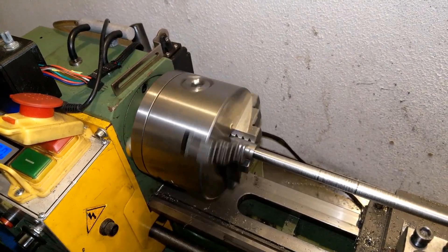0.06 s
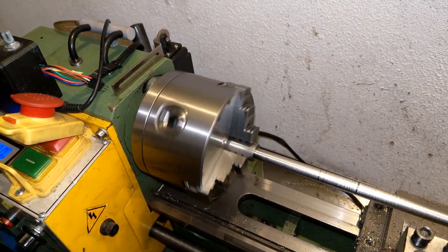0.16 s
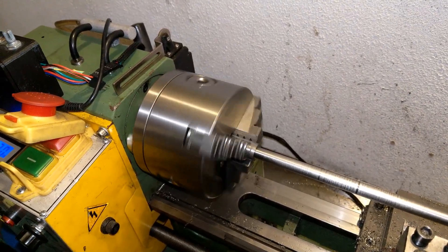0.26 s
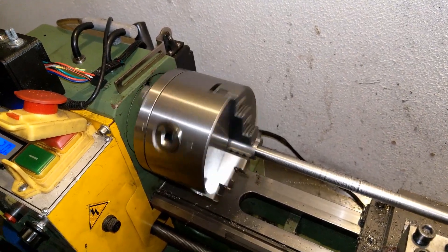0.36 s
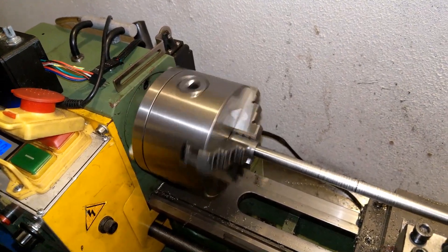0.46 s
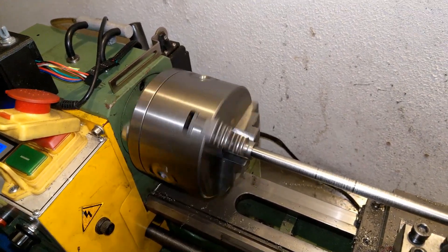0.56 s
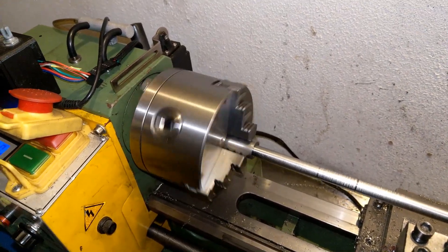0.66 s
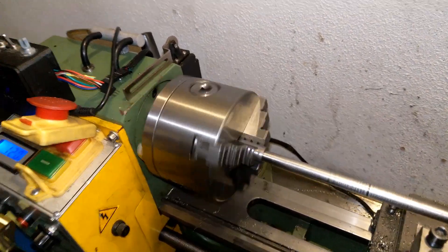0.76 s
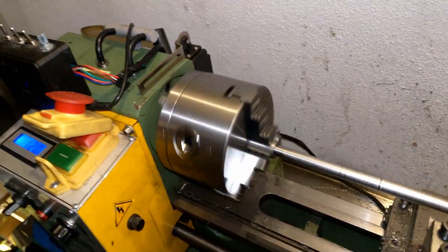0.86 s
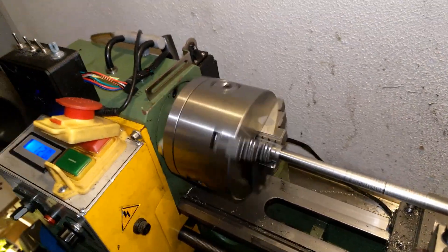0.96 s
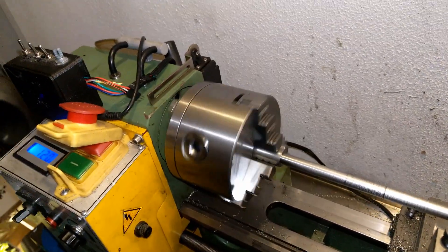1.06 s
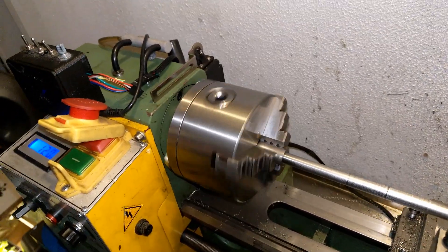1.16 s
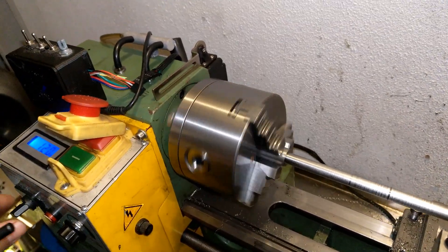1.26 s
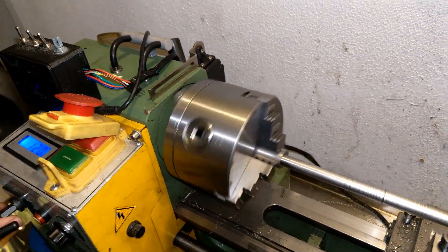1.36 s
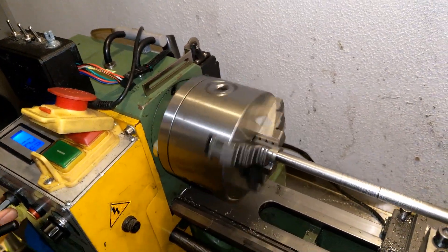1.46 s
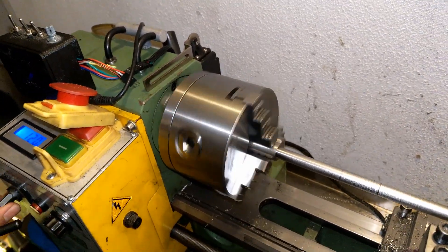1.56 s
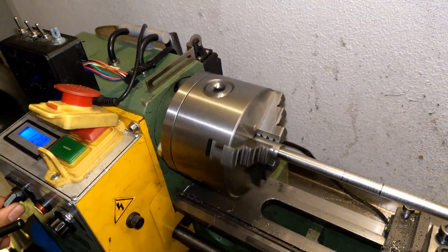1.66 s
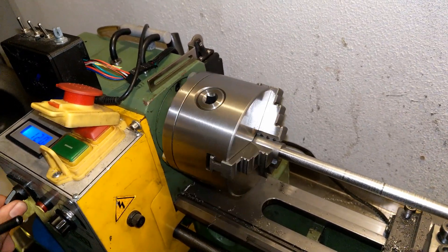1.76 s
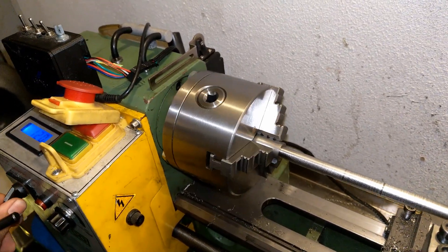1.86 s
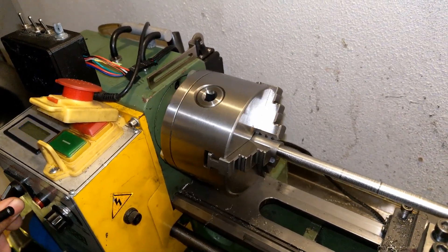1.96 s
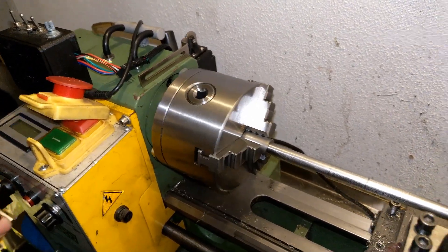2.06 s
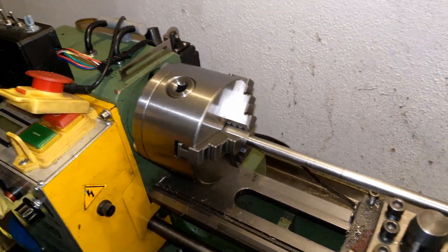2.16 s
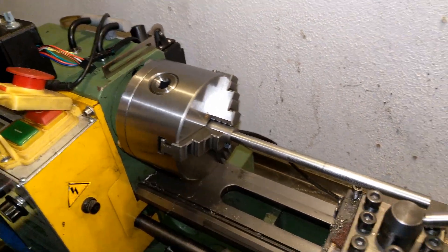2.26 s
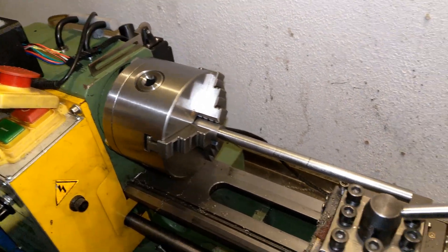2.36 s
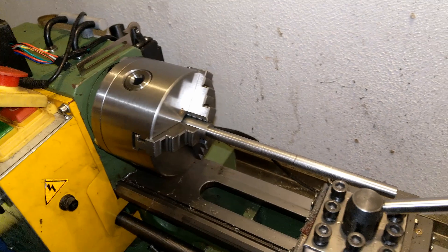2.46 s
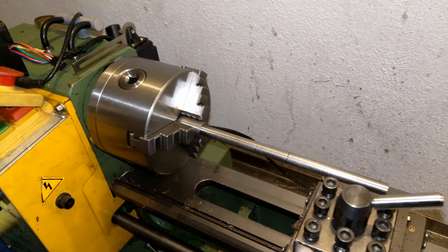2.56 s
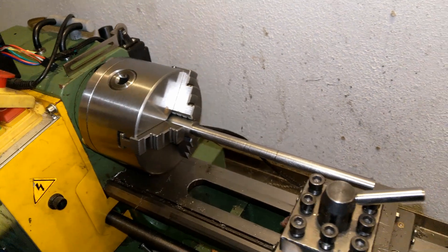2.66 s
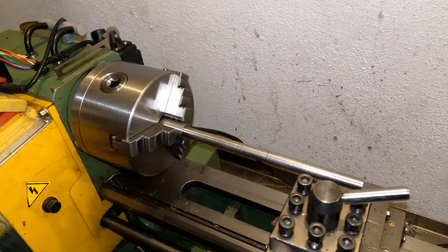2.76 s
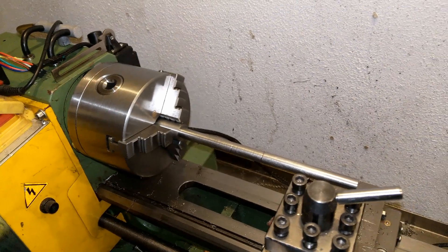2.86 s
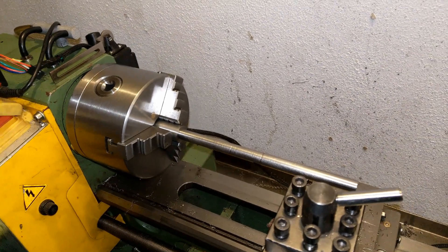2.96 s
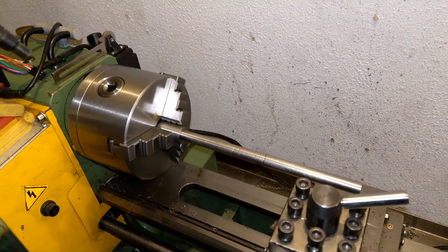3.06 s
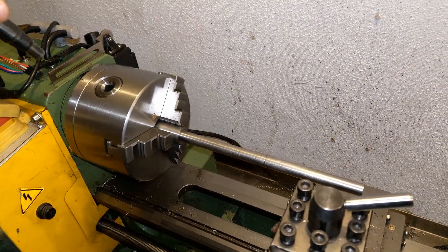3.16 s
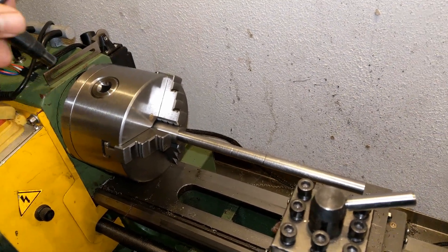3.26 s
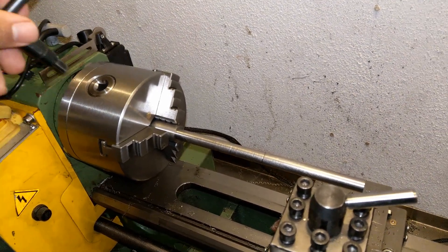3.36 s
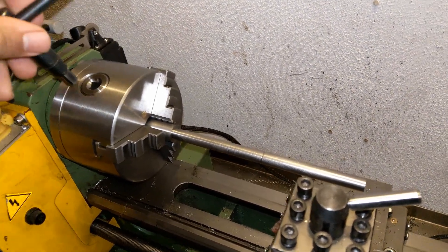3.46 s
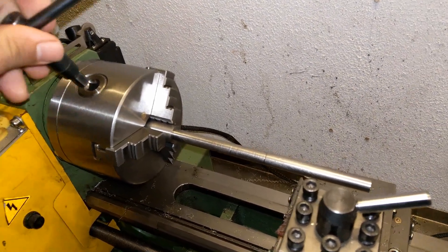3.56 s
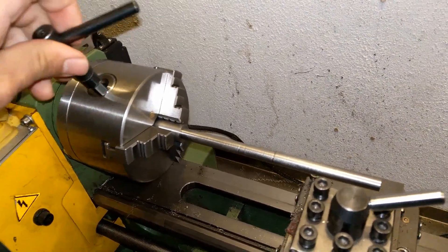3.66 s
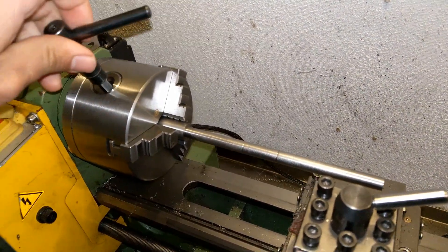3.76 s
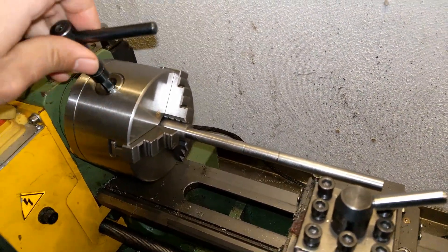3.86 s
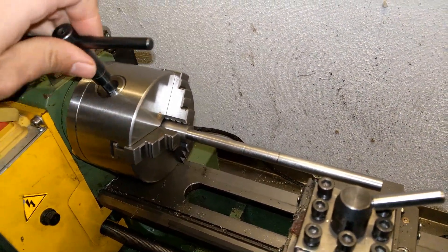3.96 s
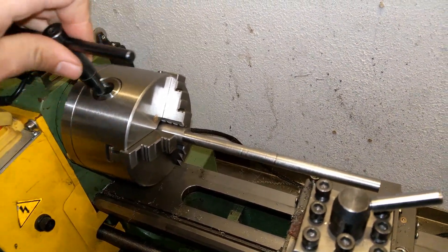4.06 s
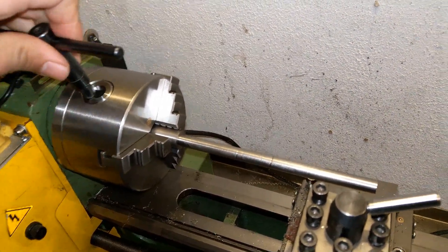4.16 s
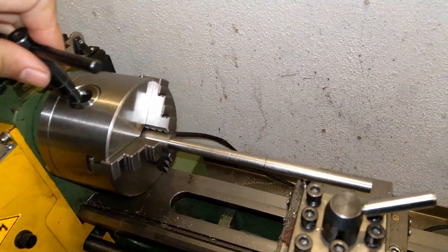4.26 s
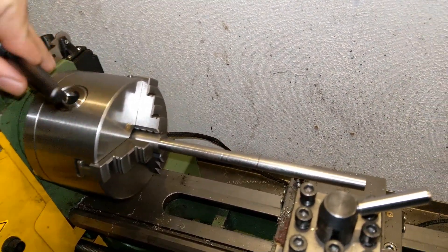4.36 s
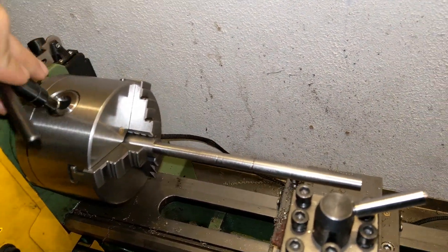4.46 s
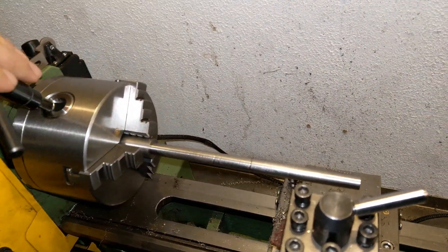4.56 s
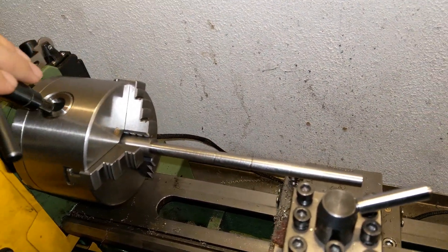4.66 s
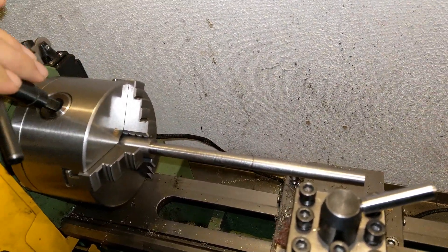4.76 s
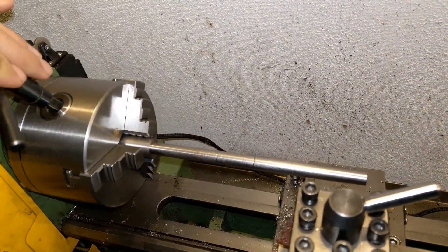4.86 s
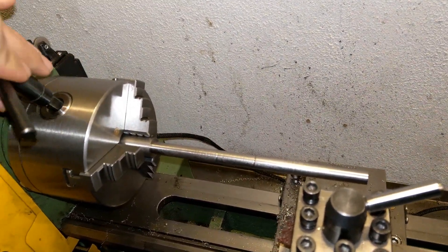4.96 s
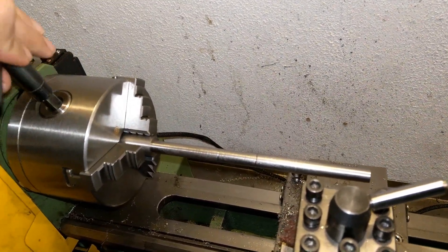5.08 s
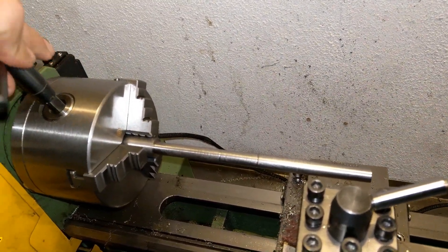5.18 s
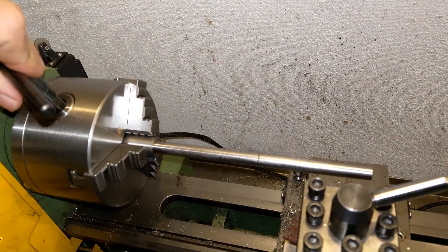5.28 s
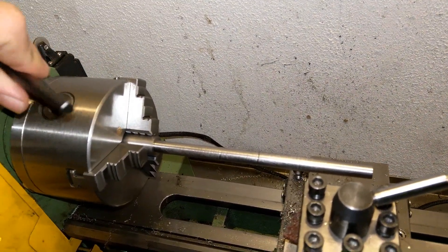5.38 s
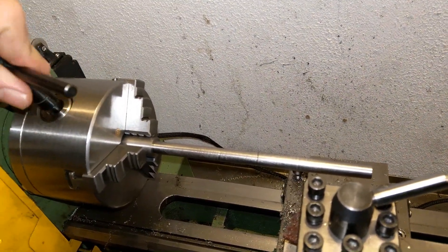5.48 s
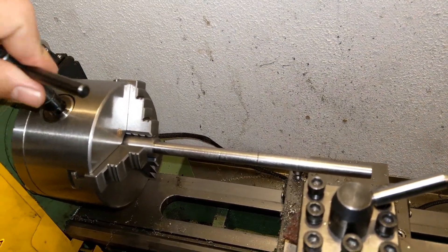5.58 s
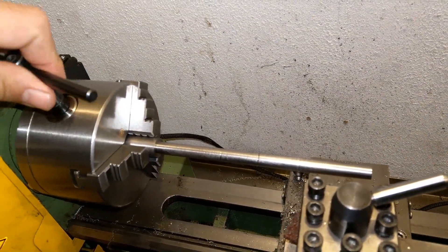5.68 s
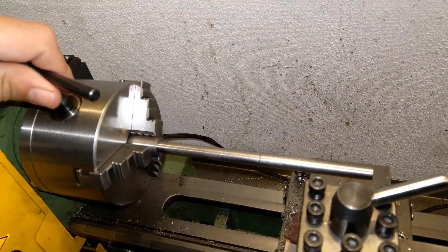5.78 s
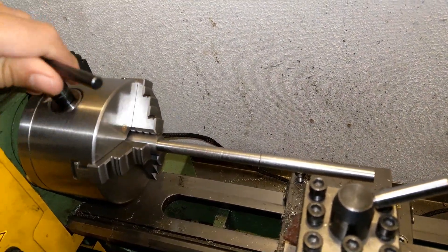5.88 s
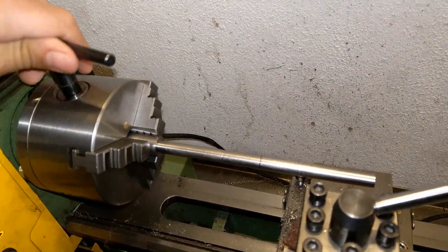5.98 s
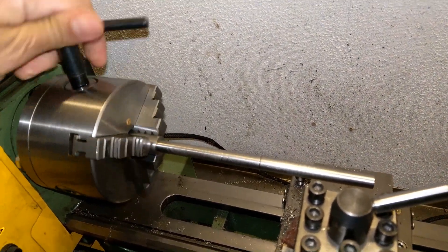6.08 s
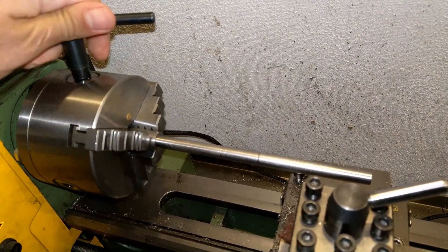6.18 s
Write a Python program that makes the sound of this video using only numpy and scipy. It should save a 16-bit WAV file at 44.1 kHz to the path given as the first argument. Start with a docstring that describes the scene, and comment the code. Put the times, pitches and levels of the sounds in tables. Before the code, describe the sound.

A small metal lathe hums close by, with whirring gears and a high hiss, while a hand bumps and rubs the microphone. Two switches snap and the machine stops with a few thuds. After a quiet pause, a steel key ticks in the chuck and is turned, bringing dull knocks, short rough groans and faint, thin squeals from the creeping motor. The place is a small workshop with hard walls.

```python
"""In a small workshop with hard walls, a metal lathe runs close to a hand-held camera.
Its motor hums and its gears whirr while the hand bumps the camera. Two switches snap and the spindle
(the main shaft) stops. A steel key is set into the chuck (the clamp on the spindle) and turned: it
ticks in its socket, knocks the spindle against its gears and makes the spiral inside the chuck groan.
The creeping motor hisses and squeals thinly."""
import sys
import numpy as np
from scipy import signal
from scipy.fft import rfft, irfft, next_fast_len
from scipy.io import wavfile
from scipy.ndimage import map_coordinates

SR = 44100
rng = np.random.default_rng(int(sys.argv[2]) if len(sys.argv) > 2 else 0)


def transcribe(u):
    """Save the signal u as a 16-bit wav file named by the first command-line argument.

    u: samples, shape (n,) or (channels, n), limited to [-1, 1]; the rate is SR.
    q: integer samples, one column per channel.
    """
    v = np.clip(np.atleast_2d(u).T, -1, 1)
    q = np.round(v * 32767).astype(np.int16)
    wavfile.write(sys.argv[1], SR, q)


N = 274467

# Tone colours of a high hiss and a deep rumble (frequency [Hz], relative level [dB])
HISS_COLOUR = [(7000, -83), (8600, -17), (9300, 1.5), (10500, 6), (12500, -1.5), (14200, -3)]
RUMBLE_COLOUR = [(12, -5), (20, -2), (81, -4.5), (97, -14), (146, -18), (173, -22.5), (200, -24),
                 (260, -30), (440, -120)]


def lathe():
    """The motor hums, its brushes hiss and the gear teeth whirr; loudness follows the speed."""
    # How fast the motor turns (time [s], speed [turns/s])
    motor_speed = [(0, 83.5), (.5, 82.6), (.9, 83.6), (1.79, 84.7), (1.88, 68.5), (2.0, 77), (2.2, 20)]
    # Tones of the hum (multiple of the motor speed, relative level [dB])
    hum_tones = [(1, 4), (2, -14.5), (4, -26.5), (8, -47), (10, -42)]
    # Gear tones at full speed (pitch [Hz], level [dB])
    gear_tones = [(149.6, -57.5), (426, -61.5), (597, -66), (631, -70), (659, -66.5), (705, -65),
                  (826, -67), (860, -63.5), (900, -64.5), (1095, -70.5), (1225, -75), (1715, -69),
                  (1905, -68), (2085, -71.5)]
    # Noise of the gears (frequency [Hz], relative level [dB])
    whirr_colour = [(120, -59), (200, -3.5), (374, -9), (427, -3), (526, -34), (610, -7.5), (774, -5),
                    (885, -5), (1360, -13), (1920, -13.5), (2290, -11), (3430, -17.5), (4680, -11),
                    (5680, -27.5), (7000, -22.5), (9100, -113), (15400, -120)]
    full_speed, tooth_hz, teeth_per_turn = 83.5, 142, 40
    mount_hz, mount_width_hz = 75.4, 6.3
    power_off_s, silent_s = 1.82, 1.93
    t = np.arange(N) / SR
    speed, = curves(motor_speed)
    pace = speed / full_speed
    tooth_angle = phase(tooth_hz * pace)
    spindle_angle = tooth_angle / teeth_per_turn
    waver = 1 + .017 * np.sin(spindle_angle) + .009 * wobble(9)  # a small surge with each turn
    shaft_angle = phase(speed * waver)
    # Hum and rattle swell as the motor slows past the rate at which its mount likes to shake.
    mount = 1 / np.hypot(1, 2 * (speed - mount_hz) / mount_width_hz)
    hum = sum(amp(db + 3.9 * wobble(11.3)) * np.sin(multiple * shaft_angle + .3 * wobble(11.66))
              for multiple, db in hum_tones)
    whine = np.zeros(N)
    for hz, db in gear_tones:
        swell_db = 3.2 * np.sin(spindle_angle + rng.uniform(0, 2 * np.pi)) + 3 * wobble(16)
        whine += amp(db + swell_db) * np.sqrt(2) * np.sin(phase(hz * pace * waver) + .45 * wobble(35))
    whirr = noise(whirr_colour) * amp(2.4 * wobble(43.37) + .67 * np.sin(tooth_angle))
    rattle = bearing(shaft_angle) * amp(7.5 * mount + .5 * np.sin(spindle_angle) + 1.1 * wobble(22))
    gears = pace ** 2.1 * (amp(-52.5) * whirr + amp(-59) * rattle)
    hiss = pace ** .94 * noise(HISS_COLOUR)
    hiss *= unit(amp(1.3 * np.cos(tooth_angle) + np.cos(2 * tooth_angle) + 1.4 * wobble(22) + wobble(90)))
    hiss *= amp(-54.5 - 94 * np.maximum(t - power_off_s, 0))  # dies once the power is cut
    shake = amp(-48) * noise(RUMBLE_COLOUR)  # the turning chuck shakes the bench
    drift = amp(-t)  # 1 dB fainter each second as the camera drifts aside
    sound = amp(-35.5) * mount * pace * hum + pace ** 7 * (whine + shake) + drift * (gears + hiss)
    return sound * (t < silent_s)


def bearing(shaft_angle):
    """The bearing ticks twice a turn, strong then weak, and makes the lathe's housing ring."""
    # Where the housing rings (pitch [Hz], width [Hz], relative level [dB])
    housing = [(437, 20, 3.5), (629, 31, 8), (908, 36, 8), (1007, 154, -2), (1686, 46, 3), (1890, 65, 5),
               (2072, 130, -2.5)]
    at = np.flatnonzero(np.diff(shaft_angle // np.pi))
    scatter_db = 2.5 * np.clip(rng.standard_normal(len(at)), -2, 2)
    ticks = np.zeros(N)
    ticks[at] = amp(scatter_db - 11 * (np.arange(len(at)) % 2))
    scrape = signal.lfilter([1], [1, -np.exp(-1 / (.00099 * SR))], ticks)  # each tick gets a short tail
    return unit(resonant(scrape * white_noise(N), housing))


def switches():
    """After a faint tap, spring-loaded contacts snap inside the sheet-metal control box."""
    # (time [s], level [dB], bass [dB], snap [dB], treble [dB], fade time [s], base echo [dB])
    snaps = [(0.9723, -58, 3.5, -13, -28, 0.0046, -17), (1.721, -36.5, -19, -7.5, -16, 0.023, -7.5),
             (1.729, -50, -13, -18, -24, 0.042, -4), (1.748, -53, -15, -9, -19, 0.03, 1),
             (1.784, -54.5, -6, -1, -21, 0.037, -3.5), (1.9309, -47, -5.5, -1, -2.5, 0.0073, -7),
             (1.9336, -49, -2, -3, -15, 0.03, 0.5), (1.940, -48.5, -7, -6, -9, 0.03, -1.5),
             (1.961, -61, -5, -12, -15, 0.015, -15), (2.051, -65, -5.5, -13, -10.5, 0.062, 4)]
    # How the box rings (pitch [Hz], relative level [dB], fade time [s])
    box_tones = [(347, -10, 0.063), (431, -5.5, 0.06), (653, -10.5, 0.067), (885, 1.5, 0.057),
                 (973, 3, 0.044), (1085, -2, 0.016), (1120, 1, 0.033), (1234, -6, 0.058),
                 (1435, -12.5, 0.076), (1655, 1, 0.021), (1940, -12, 0.085), (2110, -15, 0.059),
                 (2180, -12.5, 0.11), (2694, -16, 0.08), (2990, -20, 0.058), (3570, 1, 0.018),
                 (3920, 6.5, 0.027), (4720, -10, 0.045), (5050, -30, 0.048)]
    out = np.zeros((2, N))
    for s, db, bass_db, snap_db, treble_db, fade_s, echo_db in snaps:
        sound = blow(box_tones, bass_db, snap_db, treble_db, fade_s, snap_hz=(3080, 5770), tick_hz=10800,
                     tick_width=.11, ring_db=1, echo_db=echo_db, echo_s=.12, room_db=-21)
        add(out, s, amp(db) * sound)
    return out


def chuck_key():
    """The key ticks in its square socket and makes the steel ring."""
    # (time [s], level [dB], bass [dB], snap [dB], treble [dB], top of the snap [Hz], tick pitch [Hz],
    # fade time [s], ringing [dB])
    ticks = [(3.821, -66, 2, 0, -13, 6160, 10800, 0.0052, -7),
             (3.837, -73.5, 9, -3, -12, 6540, 10800, 0.008, -20),
             (4.141, -56.5, -5, -21, -48, 4500, 10000, 0.018, 12.5),
             (4.221, -75.5, 4, -2, -21, 4960, 9900, .054, 3),
             (4.842, -68, 4.5, -20, -46, 4600, 10000, .036, 16),
             (4.888, -67, 4, -6, -13, 5030, 9800, 0.04, -3),
             (4.915, -68.5, -1, 5.5, 9.5, 5240, 9400, 0.015, -8),
             (4.93, -60.5, -4, 0, -10, 4540, 9500, 0.12, -1),
             (4.949, -61.5, 7, -1, -8.5, 4400, 9400, 0.018, -5.5),
             (5.157, -53, -3, -24, -48, 4840, 10100, 0.0095, 17),
             (5.165, -57, -7, -15, -44, 4840, 10200, 0.038, -4),
             (5.5385, -59.5, -2, -4, -9, 7800, 9900, 0.013, -8),
             (5.544, -61.5, 0.5, -0.5, 0, 7900, 9600, 0.011, -14),
             (5.765, -72.5, 3, 9, 6, 7800, 10400, 0.22, -12),
             (5.7959, -59, 3.5, 8.5, 10.5, 7600, 10440, 0.0046, -11),
             (5.799, -59, 5, -8, -19, 5000, 10350, 0.026, 5),
             (5.998, -70, 1.5, -12, -23, 5000, 10000, 0.043, 1)]
    # How key, chuck and housing ring (pitch [Hz], relative level [dB], fade time [s])
    steel_tones = [(224.4, -3.5, 0.25), (333, 1.5, 0.046), (425, -2.5, 0.14), (465.7, 0, 0.095),
                   (634, -5, 0.1), (803, -11, 0.27), (930, -6, 0.028), (1122, 6.5, 0.028), (1530, -7, 0.14),
                   (1605, -3.5, 0.1), (1650, -7, 0.05), (1860, -8, 0.093), (2030, 2, 0.053),
                   (2342, -9, 0.14), (2585, 0.5, 0.052), (2850, 0, 0.064), (3320, -12, 0.053),
                   (3756, -1, 0.1), (3940, 2, 0.06), (4280, -3, 0.068), (9700, -8, 0.052),
                   (10000, -13, 0.025), (10230, 6, 0.017)]
    out = np.zeros((2, N))
    for s, db, bass_db, snap_db, treble_db, top_hz, tick_hz, fade_s, ring_db in ticks:
        sound = blow(steel_tones, bass_db, snap_db, treble_db, fade_s, (3090, top_hz), tick_hz,
                     tick_width=.085, ring_db=ring_db, echo_db=-2, echo_s=.11, room_db=-12.5)
        add(out, s, amp(db) * sound)
    return out


def spindle_knocks():
    """The gears have some slack, so the spindle thuds against them as it brakes or is turned."""
    # (time [s], level [dB])
    knocks = [(1.79, -25.5), (1.932, -32), (1.968, -31), (4.143, -27.5), (5.159, -21.5), (5.566, -33.5),
              (5.612, -31), (5.762, -33), (5.799, -31), (5.999, -32), (6.048, -28.5)]
    # How the spindle rings (pitch [Hz], relative level [dB], fade time [s])
    spindle_tones = [(71.3, -8.5, 0.19), (93.3, -7.5, 0.19), (162, -5.5, 0.038), (226, -20.5, 0.14)]
    out, t = np.zeros((2, N)), np.arange(SR // 3) / SR
    for s, db in knocks:
        thud = ringing(spindle_tones, t, scatter_db=1) * (1 - np.exp(-t / .005))
        add(out, s, amp(db) * thud)
    return out


def chuck_groans():
    """The spiral plate that moves the chuck's jaws sticks and slips in short, rough groans."""
    # (time [s], length [s], level [dB], pitch [Hz])
    groans = [(3.989, 0.042, -62, 592), (4.214, 0.095, -59.5, 563), (4.577, 0.042, -63.5, 614),
              (4.842, 0.034, -57, 348), (4.946, 0.03, -46, 235), (5.549, 0.043, -44, 235),
              (5.607, 0.022, -44, 300), (5.741, 0.055, -50.5, 302), (5.797, 0.032, -45, 327.6),
              (5.992, 0.021, -59, 608)]
    # Where the chuck rings (pitch [Hz], width [Hz], relative level [dB])
    chuck_body = [(229, 14.7, -1.5), (316, 16.5, -4), (446, 46, -2.5), (616, 12, -4.5), (864, 58, -5)]
    out = np.zeros(N)
    for s, length, db, hz in groans:
        envelope = stroke(length, attack_s=.0024, release_s=.019)
        size = len(envelope)
        slips = np.sin(phase(hz * np.exp(.12 * wobble(150, size)))) * amp(2.1 * wobble(103, size))
        groan = resonant(slips + 1.4 * rng.standard_normal(size), chuck_body)
        add(out, s, amp(db) * envelope * unit(groan))
    return out


def brushes():
    """The motor's brushes (its sliding contacts) hiss and squeal as they drag at a crawl."""
    # Hiss as the key turns the spindle (time [s], level [dB])
    hiss_levels = [(4.95, -100), (5.0, -78), (5.14, -64.5), (5.3, -66), (5.5, -66.5), (5.68, -74),
                   (5.88, -71), (5.98, -59), (6.22, -60.5)]
    # Noise of the dragging (frequency [Hz], relative level [dB])
    drag_colour = [(300, -4), (700, 7), (2000, 2), (3000, -2), (4400, 4.5), (5300, -6), (7000, -17),
                   (9500, -2), (14200, -1)]
    # (time [s], length [s], level [dB], start pitch [Hz], end pitch [Hz], waver [share of the pitch])
    squeals = [(2.14, 0.083, -80, 9900, 10200, 0.0068), (2.147, .06, -73, 2960, 2930, .002),
               (2.333, 0.13, -78.5, 9450, 9500, .004), (2.438, 0.15, -73, 9500, 9700, 0.0096),
               (2.64, .06, -74, 9950, 10100, .035), (5.045, 0.082, -73, 9700, 10050, 0.0096),
               (5.057, 0.085, -77, 11300, 11500, .006), (5.15, .13, -80, 12450, 12600, .011),
               (5.225, .085, -72, 10900, 10600, .015), (5.335, 0.055, -76, 11100, 11450, .011),
               (5.35, .08, -83, 12800, 12300, .014), (5.37, .065, -73, 11200, 9950, 0.0073),
               (5.44, 0.11, -74, 10400, 10050, .012)]
    hiss_db, = curves(hiss_levels)
    out = noise(drag_colour) * amp(hiss_db + 2.2 * wobble(25) + 1.8 * wobble(350))
    for s, length, db, start_hz, end_hz, waver in squeals:
        envelope = stroke(length, attack_s=.011, release_s=.013)
        size = len(envelope)
        glide_hz = np.interp(np.arange(size) / SR, [0, length], [start_hz, end_hz])
        angle = phase(glide_hz * (1 + waver * wobble(95, size)))
        scratch = min(60 * waver, .75)  # unsteady squeals are also rougher
        stereo_shift = rng.normal(0, .6, (2, 1))
        tone = np.sin(angle + stereo_shift + scratch * wobble(900, size)) * amp(3.5 * wobble(110, size))
        add(out, s, amp(db) * envelope * unit(tone))
    return out


def hand_on_camera():
    """Each bump makes the camera swing and settle; a sliding finger rasps and shakes its shell."""
    # (time [s], level [dB], pitch scale [Hz])
    bumps = [(0.361, -24.5, 39.8), (0.443, -23.5, 102), (.483, -23, 53.7), (0.533, -14.5, 51.7),
             (0.617, -17.5, 46), (0.661, -23.5, 44.4), (0.939, -25, 28.8), (0.972, -34, 59.3)]
    # Finger slides (time [s], length [s], level [dB])
    rubs = [(.49, 0.17, -48), (.65, 0.083, -61.5), (.76, 0.059, -50)]
    # Where the shell rings (pitch [Hz], width [Hz], relative level [dB])
    shell = [(1220, 820, 2), (2620, 890, -0.5)]
    # Noise of skin on the shell (frequency [Hz], relative level [dB])
    skin_colour = [(200, 11), (600, 10.5), (2000, -12), (4500, -1.5), (7000, -26), (14200, -44)]
    thumps, rubbing, t = np.zeros(N), np.zeros(N), np.arange(SR // 4) / SR
    for s, db, hz in bumps:
        angle = 2 * np.pi * hz * .016 * np.log1p(t / .0068)  # the pitch falls quickly
        swing = -np.sin(angle) * np.exp(-t * hz * 1.25)
        add(thumps, s, amp(db) * swing * (1 + .0042 * rng.standard_normal(len(t))))
    for s, length, db in rubs:
        add(rubbing, s, amp(db) * stroke(length, attack_s=.049, release_s=.053))
    rasp = unit(resonant(white_noise(N) * amp(2.9 * wobble(300)), shell))
    return thumps + rubbing * (rasp + amp(-.5) * noise(skin_colour) + amp(9.5) * noise(RUMBLE_COLOUR))


def background():
    """The quiet workshop: a low rumble, a faint wavering hum and a soft hiss."""
    # Hum of the room (pitch [Hz], level [dB])
    hum_tones = [(73, -65), (144, -78), (306.8, -79), (393, -82.5), (662, -83), (719, -87), (958, -84.5),
                 (1190, -85), (1308, -88), (1696, -88), (1749, -86.5), (1830, -87.5), (2005, -91),
                 (2191, -89), (2412, -90), (1221, -80.5), (1238, -75.5)]
    # Noise of the room (frequency [Hz], relative level [dB])
    air_colour = [(100, -39), (170, -3.5), (391, -2.5), (421, -2.5), (645, -2.5), (1100, -7.5), (1210, -10),
                  (1480, -10), (2800, -13), (3400, -18), (8300, -21), (9810, -23), (14200, -24.5)]
    hum = sum(amp(db + 1.5 * wobble(3)) * np.sqrt(2) * np.sin(phase(np.full(N, hz)) + .55 * wobble(8))
              for hz, db in hum_tones)
    rumble = amp(-53) * noise(RUMBLE_COLOUR)
    return hum + rumble + amp(-64) * noise(air_colour) + amp(-88.5) * noise(HISS_COLOUR)


def wall_echo(size):
    """The walls' answer to one click; the middle pitches last longest."""
    # (frequency [Hz], fade time [s])
    fade_times = [(150, 0.012), (1000, 0.23), (4000, 0.19), (12000, 0.027)]
    hz, t, spectrum = signal.stft(rng.standard_normal((2, size)), SR, nperseg=128)
    spectrum *= amp(-60 * t / along(fade_times, hz)[:, None])
    tail = signal.istft(spectrum, SR, nperseg=128)[1][:, :size]
    return unit(tail) / np.sqrt(size)


def blow(tones, bass_db, snap_db, treble_db, fade_s, snap_hz, tick_hz, tick_width,
         ring_db, echo_db, echo_s, room_db):
    """Metal hits metal: a crack and ringing tones, echoed by the machine and the walls."""
    size = SR // 3
    t = np.arange(size) / SR
    burst = lambda seconds: unit(white_noise(size) * amp(-60 * t / seconds))
    direct = burst(fade_s) + amp(ring_db) * unit(ringing(tones, t, scatter_db=2.5))
    direct *= 1 - np.exp(-t / (.06 * fade_s))  # long, soft contacts build up more slowly
    machine = amp(echo_db - .44 * treble_db) * burst(echo_s)  # dull blows land deep inside and echo more
    walls = amp(room_db) * signal.fftconvolve(direct, wall_echo(size), axes=1)[:, :size]
    sound = direct + (machine + walls) * (1 - np.exp(-t / .003))
    # Bass, snap and treble are each set against the middle band.
    treble_hz = (tick_hz / (1 + tick_width), tick_hz * (1 + tick_width))
    bands = [((200, 600), bass_db), ((600, 3000), 0), (snap_hz, snap_db), (treble_hz, treble_db)]
    return sum(amp(db) * unit(signal.sosfilt(signal.butter(3, edges, 'band', fs=SR, output='sos'), sound))
               for edges, db in bands)


def ringing(tones, t, scatter_db):
    """Tones of a struck part, new in strength at each hit; each drops 60 dB in its fade time."""
    out = np.zeros((2, len(t)))
    for hz, db, fade_s in tones:
        skew = rng.normal() * min(hz / 4000, 1) * np.array([[1], [-1]])  # left and right out of step
        envelope = amp(db + scatter_db * rng.normal() - 60 * t / fade_s)
        out += envelope * np.sin(2 * np.pi * hz * t + skew) * rng.choice([-1, 1])
    return out


def stroke(length, attack_s, release_s):
    """Loudness of a sliding contact: it rises, holds and dies away."""
    t = np.arange(int((length + 5 * release_s) * SR)) / SR
    return np.minimum(t / attack_s, 1) * np.exp(-np.maximum(t - length, 0) / release_s)


def white_noise(size):
    """Stereo noise whose two sides are alike in the bass, less so in the treble."""
    # (frequency [Hz], left-right likeness [0 to 1])
    likeness = [(60, 0.95), (150, 0.88), (380, 0.71), (940, 0.64), (2350, 0.39), (5870, 0.007),
                (14700, 0.072)]
    turn = lambda hz: np.arccos(along(likeness, hz)) / 2
    pair = rng.standard_normal((2, size))
    mid, side = filtered(pair, lambda hz: np.array([np.cos(turn(hz)), np.sin(turn(hz))]))
    return np.array([mid + side, mid - side])


def noise(colour):
    """Stereo noise with the given tone colour, at strength 1."""
    return unit(filtered(white_noise(N), lambda hz: amp(along(colour, hz))))


def resonant(x, peaks):
    """Pass x through a body that rings at a few pitches."""
    return filtered(x, lambda f: sum((-1) ** k * amp(db) * 1j * f * width / (hz**2 - f**2 + 1j * f * width)
                                     for k, (hz, width, db) in enumerate(peaks)))


def filtered(x, response):
    """Scale each frequency in x by response(frequency)."""
    size = x.shape[-1]
    padded = next_fast_len(size + 8192)
    return irfft(rfft(x, padded) * response(np.fft.rfftfreq(padded, 1 / SR)), padded)[..., :size]


def amp(db):
    """Decibels to gain."""
    return 10 ** (np.asarray(db) / 20)


def unit(x):
    """Scale to an average strength (rms) of 1."""
    return x / np.sqrt(np.mean(x ** 2) + 1e-20)


def along(points, hz):
    """Read between (frequency, value) points on a log scale."""
    frequencies, values = np.transpose(points)
    return np.interp(np.log(hz + 1), np.log(frequencies + 1), values)


def curves(rows):
    """One value per sample for each column after the time."""
    times, *columns = np.transpose(rows)
    return [np.interp(np.arange(N) / SR, times, column) for column in columns]


def wobble(rate, size=N):
    """A smooth curve through `rate` random points a second."""
    return map_coordinates(rng.standard_normal(int(size * rate / SR) + 4), [np.arange(size) * rate / SR])


def phase(hz):
    """Running angle of a changing frequency."""
    return 2 * np.pi * np.cumsum(hz) / SR


def add(track, s, sound):
    """Mix a sound in at s seconds."""
    part = track[..., round(s * SR):][..., :sound.shape[-1]]
    part += sound[..., :part.shape[-1]]


def scene():
    """All sources together, some pitches leaning left and others right."""
    # (frequency [Hz], left minus right [dB])
    balance = [(60, 0.5), (120, 1.5), (240, -2.5), (470, -2), (940, 1), (1870, -1.0), (3710, -2),
               (7380, -0.5), (14700, 3)]
    mix = lathe() + hand_on_camera() + switches() + chuck_key() + spindle_knocks()
    mix += brushes() + chuck_groans() + background()
    return filtered(mix, lambda hz: amp(np.outer([.5, -.5], along(balance, hz))))


def record(dry):
    """The microphone dips part of the treble, and the camera cuts off the very top."""
    # (frequency [Hz], gain [dB])
    treble_dip = [(6000, -1), (7600, -9.5), (8400, -17), (9200, 0)]
    return filtered(dry, lambda hz: amp(along(treble_dip, hz)) * (hz < 14350))


dry = scene()
out = record(dry)
transcribe(out)
```